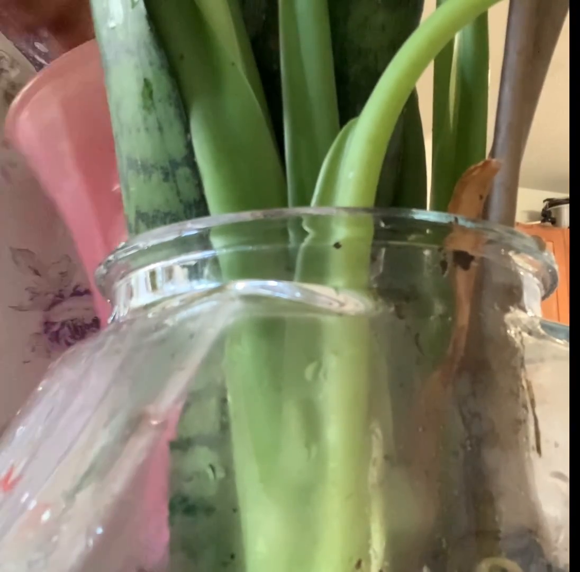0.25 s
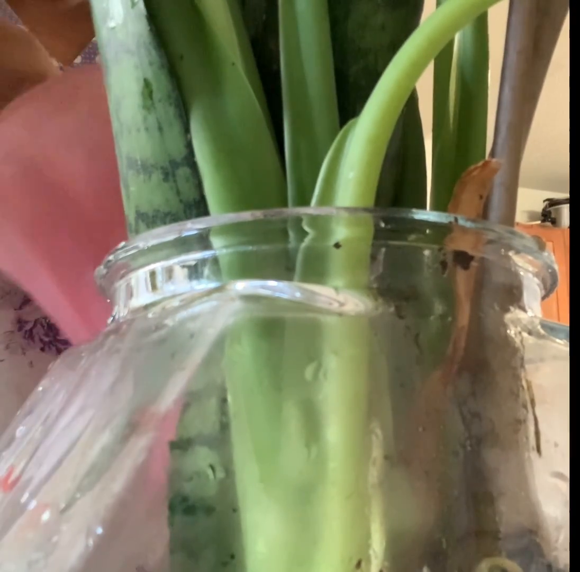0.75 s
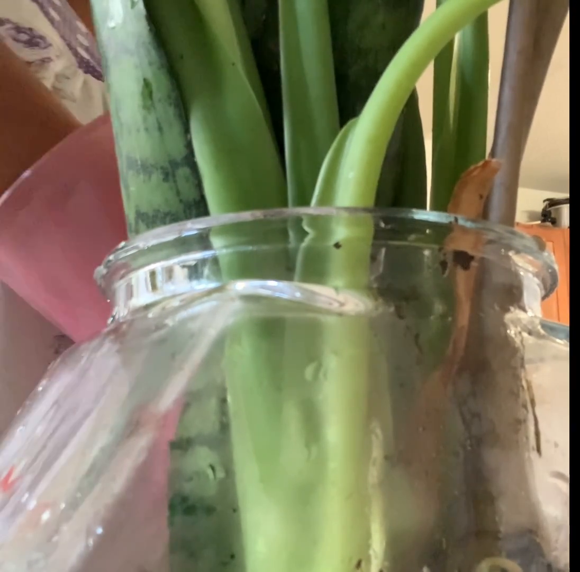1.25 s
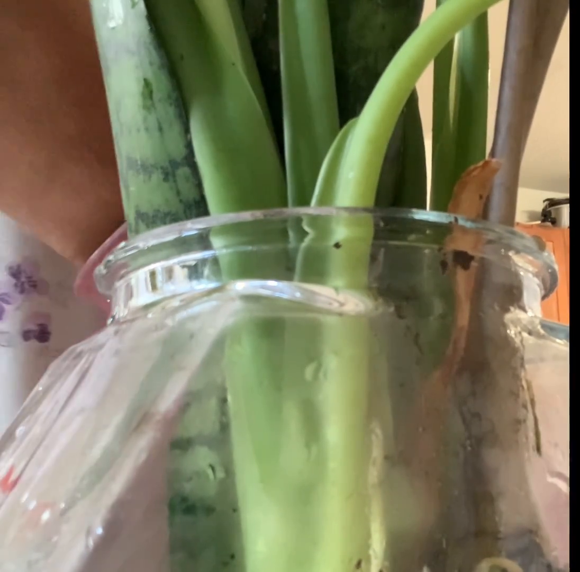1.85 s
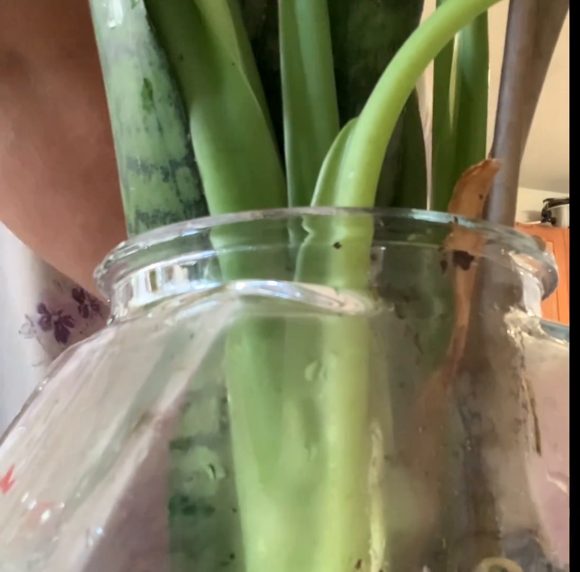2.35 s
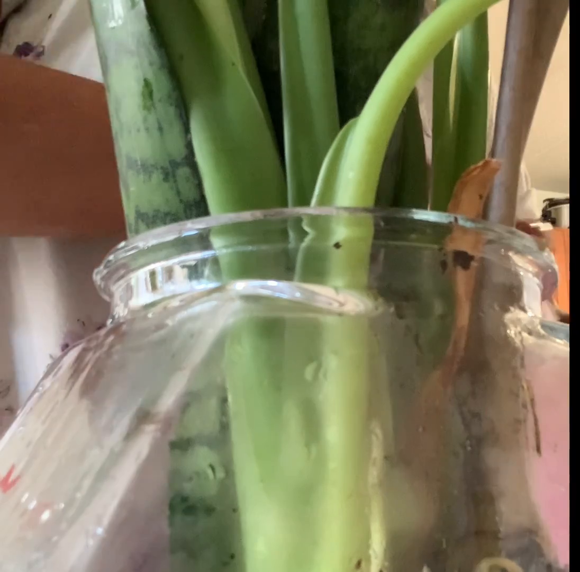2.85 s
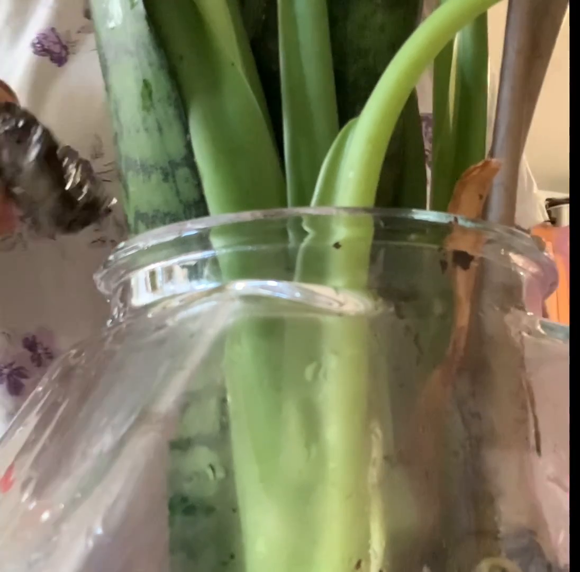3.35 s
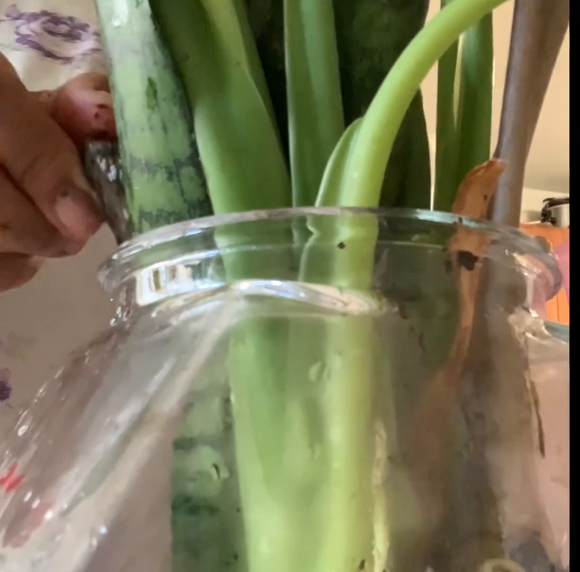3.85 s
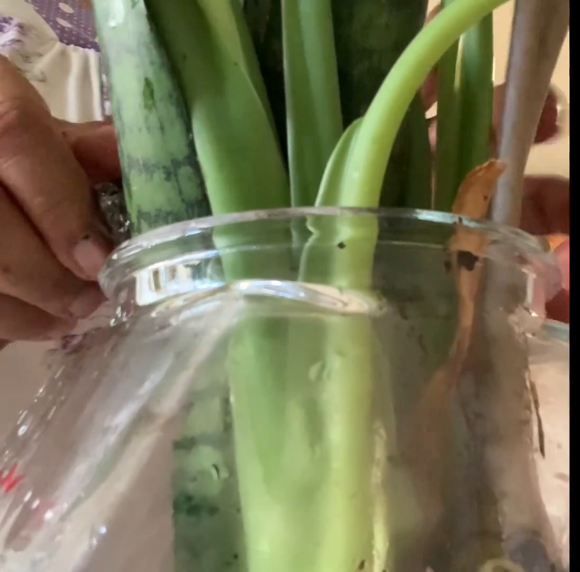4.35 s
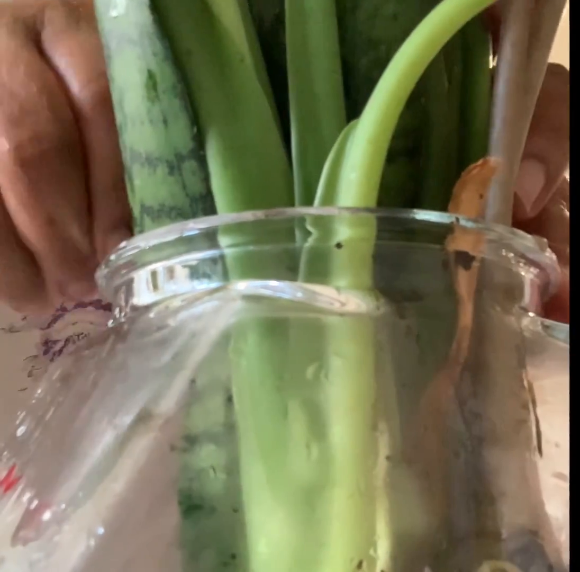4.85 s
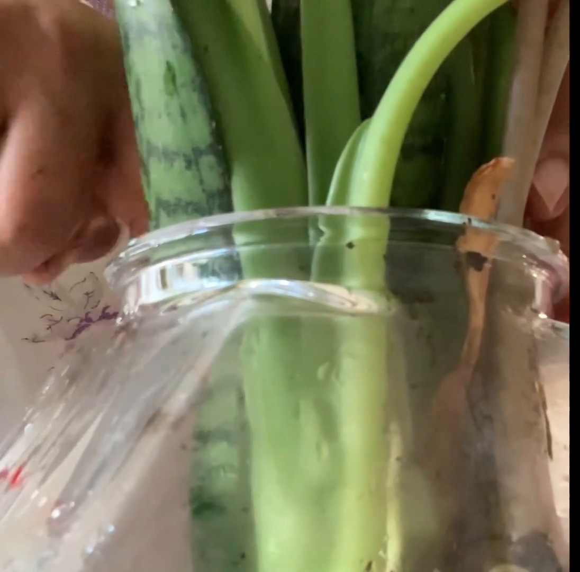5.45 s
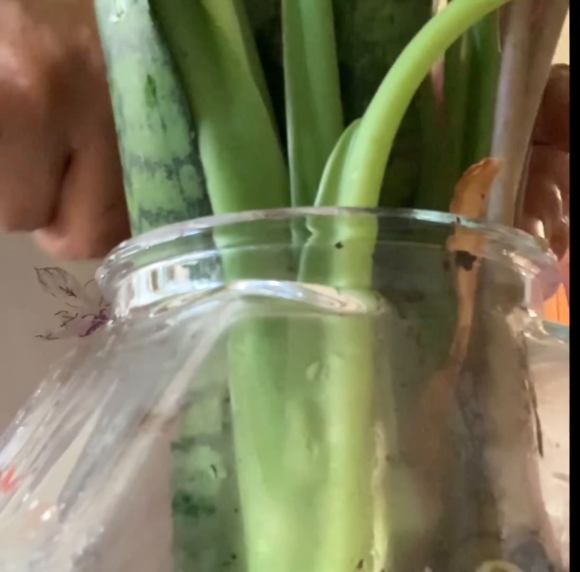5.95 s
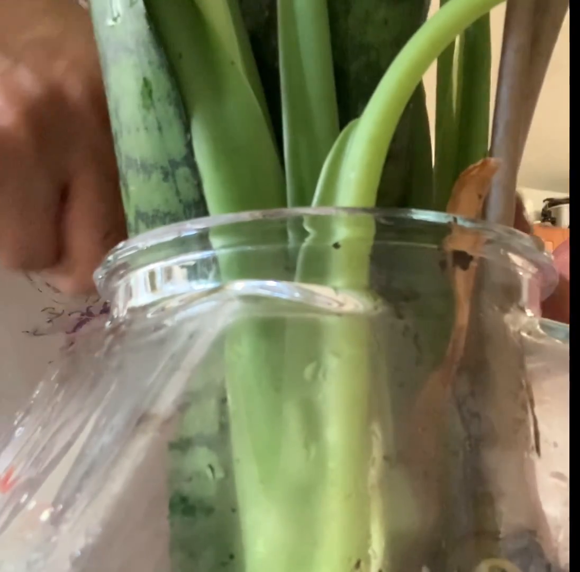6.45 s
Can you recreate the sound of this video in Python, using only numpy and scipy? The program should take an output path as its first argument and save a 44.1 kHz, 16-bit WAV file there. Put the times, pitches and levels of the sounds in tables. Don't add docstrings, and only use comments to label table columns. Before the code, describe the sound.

Close up in a small quiet room with a low hum, a jar is already ringing as a plastic jug clinks it. A very faint trickle comes and goes amid several clear clinks. The jug lands on the table with a soft thud, leaves tick, and a stone knocks the rim, skids, then rattles in growing short glassy taps, with hard knocks and a few faint bumps to finish.

```python
import sys
import numpy as np
from scipy import signal
from scipy.fft import rfft, irfft, next_fast_len
from scipy.io import wavfile
from scipy.ndimage import uniform_filter1d

SR = 44100
rng = np.random.default_rng(int(sys.argv[2]) if len(sys.argv) > 2 else 0)


def invert_db(level):
    return 10 ** (np.asarray(level, dtype=float) / 20)


def to_wav(sig):
    pcm = np.clip(np.atleast_2d(sig), -1, 1) * 32767
    pcm = np.round(pcm).astype(np.int16)
    wavfile.write(sys.argv[1], SR, pcm.T)


N = 295470


def unit(x):
    return x / np.sqrt(np.mean(x ** 2) + 1e-20)


def along(points, hz):
    f, v = np.transpose(points)
    return np.interp(np.log(hz + 1), np.log(f + 1), v)


def filtered(x, response):
    m = next_fast_len(x.shape[-1] + 2 ** 13)
    spectrum = rfft(x, m) * response(np.fft.rfftfreq(m, 1 / SR))
    return irfft(spectrum, m)[..., :x.shape[-1]]


# frequency in Hz, likeness from 0 to 1.
PORT_LIKENESS = [(120, 1), (300, .9), (500, 0.6), (1000, 0), (1400, 0), (1900, 1), (3000, 0.3), (3900, 0.8),
                 (4200, 0.88)]


def paired(two, spectrum):
    def mid_side(hz):
        turn = np.arccos(np.clip(along(PORT_LIKENESS, hz), 0, 1)) / 2
        return invert_db(along(spectrum, hz)) * [np.cos(turn), np.sin(turn)]
    mid, side = filtered(two, mid_side)
    return np.array([mid + side, mid - side])


def rush(spectrum, patchy_db, grain_db=0):
    grit = invert_db(grain_db * unit(uniform_filter1d(rng.standard_normal(N), size=60)))
    z = signal.stft(grit * rng.standard_normal((2, N)), nperseg=512)[2]
    field = uniform_filter1d(rng.standard_normal(z.shape[1:]), size=5, axis=0)
    field = uniform_filter1d(field, size=10, axis=1)
    patchy = signal.istft(z * invert_db(patchy_db * unit(field)), nperseg=512)[1][:, :N]
    return unit(paired(patchy, spectrum))


def ring(hz, db, t60, t, rise=0.00074, rough=0):
    hz, db, t60 = (np.atleast_1d(v)[:, None] for v in (hz, db, t60))
    knots = rng.standard_normal((2, len(hz), len(t) // 256 + 2))
    at = np.arange(len(t)) / 256
    sway = np.array([[np.interp(at, np.arange(len(k)), k) for k in part] for part in knots])
    waver = 1 + rough * (sway[0] + 1j * sway[1])
    modes = invert_db(db - 60 * t / t60) * np.imag(waver * np.exp(2j * np.pi * hz * t))
    return np.sum(modes, 0) * (1 - np.exp(-t / rise))


# frequency in Hz, level in dB per Hz.
CRACK_SPECTRUM = [(1500, -20.5), (3500, -4), (5500, 1.5), (7600, -1), (10000, -4.5), (13000, -7.5),
                  (16000, -7.5)]
# frequency in Hz, level in dB per Hz.
BODY_SPECTRUM = [(500, -20.5), (900, -3.5), (1600, 0), (2100, 0.5), (2500, -1), (3200, -4.5), (4200, -5),
                 (6000, -37.5)]


def crack(db, t60, t, spectrum=CRACK_SPECTRUM, rise=0.00023):
    noise = unit(filtered(rng.standard_normal(len(t)), lambda hz: invert_db(along(spectrum, hz))))
    return invert_db(db - 60 * t / t60) * (1 - np.exp(-t / rise)) * noise


def add(track, s, x):
    track[round(s * SR):][:len(x)] += x


# frequency in Hz, level in dB per Hz.
HUM_SPECTRUM = [(13, -34), (22, -10.5), (39, -9), (60, 4.5), (102, -7), (138, 3.5), (162, -37.5),
                (240, -2.5), (269, -14), (339, -7.5), (365, -16), (404, -25), (516, -14), (555, -21),
                (700, -22), (910, -50.5), (1540, -120)]
# frequency in Hz, level in dB per Hz.
AIR_SPECTRUM = [(500, -1.5), (800, -1.5), (1200, -2.5), (1900, -5), (3000, -13), (4500, -26.5),
                (7000, -29.5), (11000, -31.5), (13000, -45.5), (15900, -71.5)]


def room_tone():
    return invert_db(-49) * rush(HUM_SPECTRUM, patchy_db=1.2) + invert_db(-63.5) * rush(AIR_SPECTRUM, patchy_db=1.74)


# frequency in Hz, t60 in seconds, level in a clink in dB,
# level of the ring already sounding at the start in dB.
JAR_MODES = [(283.6, 0.12, 5.5, -42), (1457, 0.2, 2, -28), (2060, 0.14, -25, -42), (2218, 0.12, 5.5, -39.5),
             (2300, 0.15, -3.5, -40), (2284, 0.251, -26, -15.5), (2900, 0.16, -17.5, -43),
             (3242, 0.31, -1.5, -31.5), (3243, 0.035, 8.5, -38), (3340, 0.2, -11, -32.5),
             (3410, 0.057, -5.5, -35), (3520, 0.037, 0, -40.5), (3703, 0.13, -7, -37),
             (3990, .12, -12.5, -34.5), (5700, 0.15, -9, -58), (6393, 0.12, -3, -52.5),
             (6370, 0.16, -9.5, -56.5), (6524, 0.07, 2.5, -66), (7780, 0.065, -15, -62),
             (8100, .12, -30, -60.5), (8900, 0.082, -3, -58), (10170, 0.026, 0, -66.5)]
# start in seconds, change in dB, duration in seconds.
OPENING_DAMPED = (.068, -7.5, .012)


def opening_ring():
    out, t = np.zeros(N + SR), np.arange(SR // 3) / SR
    hz, t60, _, start_db = np.transpose(JAR_MODES)
    loose = (hz[:, None] > 2000) + 0.1
    touch_s, touch_db, over_s = OPENING_DAMPED
    damped = invert_db(touch_db * np.clip((t - touch_s) / over_s, 0, 1))
    noise = crack(-43, 0.056, t, BODY_SPECTRUM) + crack(-45.5, 0.35, t, BODY_SPECTRUM) + crack(-50.5, 0.15, t)
    add(out, 0, damped * ring(hz, start_db, t60, t, rough=.05 * loose) + noise)
    return out[:N]


# start in seconds, upper ring in dB, then low ring, middle ring and tick
# in dB relative to the upper ring.
CLINKS = [(0.0654, -33.5, -32, -12.5, -3), (0.7533, -63.5, 0.5, -10.5, -13.5), (1.4087, -70, -8, -9, 7.5),
          (1.5564, -36.5, -19.5, -10, -20), (1.704, -56, -14.5, -10, -11), (1.893, -32, -5, -14.5, -18),
          (1.949, -32, -7.5, -14, -23.5), (2.0962, -50.5, 0, -6, 4), (2.1247, -43, -12, -3, -8),
          (2.383, -62.5, 7, -7, 10.5), (2.4489, -56, 1.5, -6, 7), (3.5814, -72, 17.5, -9, 5),
          (3.6608, -74.5, 14.5, -2.5, 6), (3.817, -69, 7, -9, 3)]
HOLLOW_DB = -12.5


def clinks():
    out, t = np.zeros(N + SR), np.arange(SR // 3) / SR
    hz, t60, clink_db, _ = np.transpose(JAR_MODES)
    loose = (hz[:, None] > 2000) + 0.1
    bands = [hz < 600, hz < 1800, hz < 2500, hz < 5500]
    for s, db, low_db, middle_db, tick_db in CLINKS:
        group = np.select(bands, [HOLLOW_DB - 6.5, low_db, middle_db, 0], tick_db - 8.5)
        levels = db - 4 + clink_db + group + rng.normal(0, 0.68, len(hz))
        tick = crack(db + tick_db - 7.0, 0.018, t) + crack(db - 7, 0.023, t, BODY_SPECTRUM)
        add(out, s, ring(hz, levels, t60, t, 0.0011, 0.45 * loose) + tick)
    return out[:N]


# start in seconds, frequency in Hz,
# level in dB, t60 in seconds, rise in seconds.
SINGLE_MODES = [(0.753, 283.6, -41.5, .12, 0.00076), (1.544, 3440, -38, .03, .004),
                (1.552, 3405, -32, 0.051, 0.003), (1.556, 3350, -37, .3, .002), (1.558, 2218, -41, 0.19, .004),
                (1.949, 283.6, -46, 0.13, .0007), (2.125, 1900, -48, .04, .001), (2.126, 1010, -48.5, .05, .001),
                (3.817, 6745, -69, 0.18, .001), (3.817, 7644, -71, .14, .001), (3.817, 8414, -68, .11, .001),
                (3.178, 1010, -30, .045, .001), (2.0966, 283.6, -32.5, 0.11, .0007),
                (2.096, 3450, -54, 0.045, .0012), (2.1246, 283.6, -42, .12, .0007),
                (2.451, 950, -47, .04, .0012), (5.352, 2940, -33.5, 0.038, .0015), (5.405, 1330, -30, .07, .004)]


def single_modes():
    out, t = np.zeros(N + SR), np.arange(SR // 3) / SR
    for s, hz, db, t60, rise in SINGLE_MODES:
        add(out, s, ring(hz, db, t60, t, rise, 0.11))
    return out[:N]


# time in seconds, pressure as body level in dB.
RUB_PRESSURE = [(0, -63), (.54, -80), (.86, -66.5), (1.31, -65.5), (1.94, -64.5), (2.03, -59),
                (2.29, -70.5), (2.82, -57.5), (3.38, -69), (3.69, -80), (4.25, -71), (4.42, -57.5),
                (4.81, -49), (4.98, -59.5), (5.32, -65), (5.97, -66), (6.7, -84)]
# start in seconds, hold in seconds, fade in seconds,
# hiss in dB, body in dB relative to the hiss.
STROKES = [(.762, 0, .05, -78.5, 3), (.95, 0, 0.071, -80, 13), (1.143, 0.16, 0.1, -71.5, 2),
           (1.34, 0.195, .1, -83.5, 12.5), (1.696, 0, 0.073, -76, 18), (2.665, 0.2, .11, -61.5, 1.5),
           (3.237, 0.072, 0.098, -64, 2.5), (3.4, 0.0057, 0.12, -73, 7.5), (3.905, 0.063, .07, -66, 25),
           (4.26, 0.071, 0.28, -61, 14), (4.63, 0, .015, -67.5, 19), (5.352, 0.014, 0.026, -48.5, 5.5),
           (5.423, 0.0033, 0.019, -49, 6), (5.45, 0, 0.13, -63, 6), (5.662, 0, 0.17, -75, 7.5),
           (5.768, .33, 0.11, -80.5, 14), (6.334, 0.015, 0.06, -77, 15.5), (6.462, .05, 0.064, -77, 15.5)]
# frequency in Hz, level in dB per Hz.
DRAG_SPECTRUM = [(50, -44.5), (90, -11), (130, -3), (250, -1), (400, -2), (800, -19), (1500, -46.5)]
# frequency in Hz, level in dB per Hz.
HISS_SPECTRUM = [(3000, -14), (4900, -14), (6000, 0), (7800, -1.5), (9500, -1), (12000, -9.5), (15600, -10),
                 (15900, -73)]
DRAG_REST_DB, DRAG_FROM_DB, DRAG_GROWS = -53, -65, .85
FADE_DB, RISE_SHARE, RISE_S = 25.5, 0.51, 0.049
LOW_LINGERS = .7
STROKE_DRAG_DB, DRAG_BUILDS = 19, 1.77


def rubbing():
    t = np.arange(N) / SR
    pressure_db = np.interp(t, *np.transpose(RUB_PRESSURE))
    bed_drag_db = DRAG_REST_DB - 4.5 + DRAG_GROWS * np.maximum(pressure_db - DRAG_FROM_DB, 0)
    hiss, body, drag = 0, invert_db(pressure_db - 5) ** 2, invert_db(bed_drag_db) ** 2
    for s, hold, fade, hiss_db, body_db in STROKES:
        rise_db = FADE_DB * np.maximum(s - t, 0) / min(RISE_SHARE * fade, RISE_S)
        fall_db = FADE_DB * np.maximum(t - s - hold, 0) / fade
        low = invert_db(hiss_db + body_db - rise_db - LOW_LINGERS * fall_db) ** 2
        hiss = hiss + invert_db(hiss_db + 3.0 - rise_db - fall_db) ** 2
        body = body + invert_db(1.5) ** 2 * low
        drag = drag + invert_db(STROKE_DRAG_DB) ** 2 * fade ** DRAG_BUILDS * low
    out = np.sqrt(drag) * rush(DRAG_SPECTRUM, patchy_db=0.0, grain_db=-1.0)
    out = out + np.sqrt(body) * rush(BODY_SPECTRUM, patchy_db=1.0, grain_db=1.5)
    return out + np.sqrt(hiss) * rush(HISS_SPECTRUM, patchy_db=2.5, grain_db=1.0)


# time in seconds, level in dB.
TRICKLE_LEVEL = [
    (.75, -92),
    (.95, -71.5),
    (1.65, -65.5),
    (1.85, -83),
]
# frequency in Hz, level in dB per Hz.
STREAM_SPECTRUM = [(1500, -30), (2100, -8), (2480, 0.5), (2800, -10), (3600, -29)]


def trickle():
    level_db = np.interp(np.arange(N) / SR, *np.transpose(TRICKLE_LEVEL), left=-120, right=-120)
    return invert_db(level_db) * rush(STREAM_SPECTRUM, patchy_db=1.5, grain_db=3.0)


# start in seconds, peak in dB, pitch in Hz, then thud and crack
# in dB relative to the peak.
KNOCKS = [(2.452, -46, 1470, 1, -10), (3.9048, -28, 1496, -7.5, -25), (3.9073, -10, 2400, -9, -20.5),
          (3.9105, -15, 1644, -4, -26.5), (3.9275, -19, 2440, -10, -17), (3.929, -18, 1600, -5.5, -24.5),
          (3.972, -31, 716, 6, -31), (3.985, -34, 1900, 2, -25), (3.998, -36.5, 1800, 3, -26),
          (5.3106, -15, 2136, -20, -25), (5.311, -23, 702, -6, -30), (5.3495, -32, 2900, -4, -4),
          (5.3819, -9, 785, -31, -22.5), (5.3825, -20, 2400, -20, -22), (5.384, -10, 1150, -12, -31),
          (5.386, -15, 1507, -12, -30), (5.392, -15, 2300, -20, -25), (5.394, -7, 1600, -6, -35.5),
          (5.781, -47.5, 1440, -6, -18.5), (5.803, -42.5, 1490, 0, -15), (5.944, -43.5, 1980, -17.5, -26),
          (5.961, -29, 1875, -12, -44), (5.997, -35.5, 777, -5, -30), (6.338, -50, 1720, -9, -26.5)]
KNOCK_T60_S, SOFTER_S_PER_DB = .013, .0007


def knocks():
    out, t = np.zeros(N + SR), np.arange(SR // 9) / SR
    thud_hz, thud_t60 = [200.3, 339.3, 425, 533, 719], [0.02, 0.091, 0.054, 0.031, 0.042]
    thud_under_db = np.array([3.0, 10, 2.2, 6.2, 10.0])
    for s, db, hz, thud_db, crack_db in KNOCKS:
        t60 = KNOCK_T60_S - SOFTER_S_PER_DB * db
        tone = ring([hz, 1.2 * hz], [db - 4.5, db - 14.5], [t60, 0.72 * t60], t)
        burst = crack(db - 11, 1.2 * t60, t, BODY_SPECTRUM)
        thud = ring(thud_hz, db + thud_db - thud_under_db, thud_t60, t, 0.0024, 0.37)
        add(out, s, tone + burst + thud + crack(db + crack_db - .6, 0.02, t))
    return out[:N]


# start in seconds, peak in dB, body in dB relative to the peak.
LEAF_TICKS = [(2.8694, -41, -3.5), (3.1158, -58.5, 1), (3.1627, -46.5, 11), (3.1727, -47, 21),
              (3.245, -40, -9), (3.3141, -47, -22), (3.4028, -50.5, -0.5), (3.644, -55, -20.5),
              (4.123, -67.5, 13.5), (4.7839, -46, -1), (5.4211, -34, -14), (5.662, -55, -7),
              (5.8559, -59, 2), (6.1694, -69.5, 1.5)]


def leaf_ticks():
    out, t = np.zeros(N + SR), np.arange(SR // 9) / SR
    for s, db, body_db in LEAF_TICKS:
        click = crack(db + 5, 0.0035, t) + crack(db - 3, 0.018, t)
        add(out, s, click + crack(db + body_db - 5.0, 0.057, t, BODY_SPECTRUM))
    return out[:N]


# start in seconds, level in dB, contact in seconds.
SET_DOWN = [
    (3.1725, -40.5, 0.00035),
    (3.1757, -30.5, 0.00043),
    (3.1795, -20, 0.00063),
    (3.1868, -17.5, 0.0007),
    (3.22, -36, 0.00085),
]
# frequency in Hz, width in Hz, level in dB.
TABLE_MODES = [(72.4, 21, -6.5), (124, 32, -11.5), (236, 42, -4), (406, 78, -7.5), (732, 65, -0.7),
               (1020, 31, 3.5), (1600, 400, -25), (2400, 590, -32)]


def set_down():
    t, blows = np.arange(N) / SR, 0
    for s, db, contact in SET_DOWN:
        blows = blows + invert_db(db + 25.5) * np.exp(-((t - s) / contact) ** 2) * 0.0012 / contact

    def table_top(f):
        total = 0
        for k, (centre, width, db) in enumerate(TABLE_MODES):
            resonance = 1j * f * width / (centre * centre - f * f + 1j * f * width)
            total = total + (-1) ** k * invert_db(db) * resonance
        return total
    return -filtered(blows, table_top)


# start in seconds, peak in dB.
SNAPS = [
    (3.6425, -30),
    (3.7255, -66),
    (3.757, -66.5),
    (3.772, -65.5),
    (3.8505, -66),
    (3.663, -60),
    (3.671, -60),
]


def leaf_snaps():
    out, t = np.zeros(N + SR), np.arange(256) / SR
    for s, db in SNAPS:
        add(out, s, crack(db, .0025, t, [(4000, -30), (6000, 0.5), (16000, -0.5)], .0001))
    return out[:N]


# frequency in Hz, level in dB, t60 in seconds.
HELD_MODES = [(740, -19, 0.04), (874, -21, 0.068), (1064, -20, .04), (1560, -8, 0.055), (1588, 5, 0.044),
              (1680, -8, 0.035), (1957, 6.5, 0.072), (2250, -8, .03), (2380, -5, .028), (2530, 6, 0.0098),
              (2620, -10, 0.03), (2983, 6, 0.021), (4200, -3.5, 0.03)]
# frequency in Hz, t60 in seconds, rise in seconds.
CAVITY = (405, 0.085, 0.0036)


def stone_hit(track, s, db, cavity_db, crack_db, second_db, third_db, third_pitch):
    t = np.arange(SR // 9) / SR
    hz, mode_db, t60 = np.transpose(HELD_MODES)
    group = np.select([hz < 1800, hz < 2100], [0, second_db], third_db)
    pitch = hz * np.where(hz > 2300, third_pitch, 1) * rng.normal(1, 0.0022, len(hz))
    levels = db - 3.5 + mode_db + group + rng.normal(0, 2.2, len(hz))
    glass = ring(pitch, levels, t60, t, .0009, rough=.3)
    cavity_hz, cavity_t60, cavity_rise = CAVITY
    cavity = ring(cavity_hz, db + cavity_db + 0.5, cavity_t60, t, cavity_rise)
    scrape = crack(db + crack_db + 3, 0.02, t) + crack(db + third_db - 6.5, 0.065, t, BODY_SPECTRUM)
    add(track, s, glass + cavity + scrape)


# cavity, crack, second and third ring in dB relative to the slip, pitch share of the third.
SKID_COLOUR = (-2, -21.5, -8.5, -4, 1.07)
SKID_S, SLIP_GAP_S, SKID_DB, SKID_FADE_DB, SKID_SLIPS = 3.939, .0082, -28, 1.5, 6


def skid():
    out = np.zeros(N + SR)
    for k in range(SKID_SLIPS):
        db = SKID_DB - k * SKID_FADE_DB + rng.normal(0, 2.2)
        stone_hit(out, SKID_S + k * SLIP_GAP_S, db, *SKID_COLOUR)
    return out[:N]


# start in seconds, peak in dB, then cavity, crack and upper rings
# in dB relative to the peak.
CHATTER = [(4.1373, -40.5, -15, -32, 0), (4.4615, -35.5, -23.5, -22, 0), (4.5345, -30, -42, -30, -1),
           (4.637, -23, -26, -30.5, 5), (4.6454, -26.5, -10.5, -28, 8), (4.654, -30.5, -20, -30, 7),
           (4.662, -31.5, -20, -33, 4.5), (4.671, -32, -18, -35, 4), (4.683, -30, -8, -35, 8.5),
           (4.699, -36.5, -10, -35, 8), (4.7094, -36, -9.5, -29.5, 5), (4.723, -41, -10.5, -30, 10),
           (4.7662, -28.5, -11, -38, -0.5), (4.7721, -25.5, -10.5, -35.5, -0.5),
           (4.7893, -23, -28, -29.5, -1), (4.795, -16.5, -18.5, -19.5, 1.5), (4.8114, -26, -21, -29.5, 0),
           (4.8261, -18, -21.5, -16.5, 0.5), (4.8375, -21.5, -17.5, -17, 3),
           (4.8685, -14.5, -27.5, -21, 1.5), (4.8826, -15, -17, -23, 0), (4.8904, -17.5, -6.5, -30, 0),
           (4.9016, -21, -12.5, -16, 1.5), (4.909, -24, -11.5, -30, 0), (4.9158, -21, -8, -35, 1),
           (4.997, -31.5, -14.5, -49, 0), (5.0165, -32, -22.5, -45.5, -1), (5.032, -26.5, -33, -42.5, 1.5),
           (5.111, -25, -13, -24, 1), (5.1204, -15.5, -13, -24, 0), (5.125, -18, -15, -28, 0),
           (5.1318, -7.5, -16, -26, -5), (5.136, -13, -15.5, -26.5, 0), (5.1422, -13.5, -4, -17.5, 0),
           (5.1863, -14, -16, -24.5, 1), (5.196, -13.5, -12, -12.5, 0), (5.2041, -14.5, -9.5, -30, 1),
           (5.246, -27, -25, -28.5, 0)]
# dB under the first at a -15 dB contact, dB gained per dB of contact.
SECOND_RING = (-9, 0.17)
# dB under the first at a -15 dB contact, dB gained per dB of contact.
THIRD_RING = (-11, .45)


def chatter():
    out = np.zeros(N + SR)
    for s, db, cavity_db, crack_db, upper_db in CHATTER:
        harder_db = db + 15
        second_db = SECOND_RING[0] + SECOND_RING[1] * harder_db + 0.36 * upper_db
        third_db = THIRD_RING[0] + THIRD_RING[1] * harder_db + upper_db
        stone_hit(out, s, db, cavity_db, crack_db, second_db, third_db, 1)
    return out[:N]


# frequency in Hz, t60 in seconds.
ROOM_DECAY = [(150, 0.52), (1000, 0.34), (4000, 0.39), (12000, 0.19)]
# t60 in seconds, level in dB over the late tail.
EARLY = (0.051, 8.8)


def room(x):
    hz, t, z = signal.stft(rng.standard_normal((2, SR // 2)), SR, nperseg=256)
    early_t60, early_db = EARLY
    decay = invert_db(-60 * t / along(ROOM_DECAY, hz)[:, None]) + invert_db(early_db - 60 * t / early_t60)
    tail = paired(signal.istft(z * decay, SR, nperseg=256)[1], [(100, -3.5), (8000, -5.5)])
    tail = tail / np.linalg.norm(tail[0])
    return signal.fftconvolve(np.pad(x, (130, 0))[None], tail, axes=1)[:, :N]


# frequency in Hz, left lead in radians, left over right in dB.
SHADOW = [(100, -.2, -1.5), (250, .8, 2), (350, -.7, -5), (600, .3, -1), (1000, 1.2, -5), (1600, .6, .5),
          (2000, .3, .7), (2300, .7, -3), (3000, 1.0, 0), (4000, 0, 0)]


def near(x):
    table, half = np.array(SHADOW), np.array([[.5], [-.5]])

    def ports(hz):
        gap = invert_db(half * along(table[:, [0, 2]], hz))
        return gap * np.exp(1j * half * along(table[:, :2], hz))
    return filtered(x, ports)


def scene():
    background = room_tone()
    glass = opening_ring() + clinks() + single_modes()
    friction, stream = rubbing(), trickle()
    dull = knocks() + leaf_ticks() + leaf_snaps()
    table = set_down()
    stone = skid() + chatter()
    wet = room(invert_db(-3.0) * glass + invert_db(-13.5) * stone) + room(invert_db(-8.5) * dull + invert_db(-13.5) * table)
    direct = near(glass) * invert_db(-3 * np.array([[.5], [-.5]])) + near(stone + dull + table)
    return direct + wet + friction + background + stream


def low_pass(x):
    return signal.sosfilt(signal.butter(12, 17170, fs=SR, output="sos"), x)


# frequency in Hz, level in dB.
OVERALL_RESPONSE = [(22, -10), (45, 0), (4100, 0), (4900, 4.5), (5700, 3), (12000, -2), (16000, 1.5)]
LAG, TOP_HZ = 5, 16000


def record(dry):
    late = np.array([np.pad(dry[0], (LAG, 0))[:N], dry[1]])
    mix = filtered(late, lambda hz: invert_db(along(OVERALL_RESPONSE, hz)) * (hz < TOP_HZ))
    return low_pass(mix)


dry = scene()
out = record(dry)
to_wav(out)
```